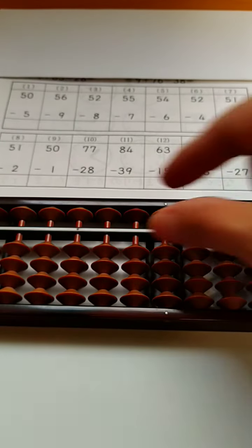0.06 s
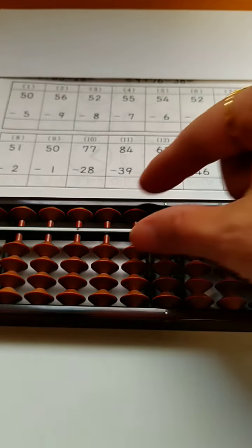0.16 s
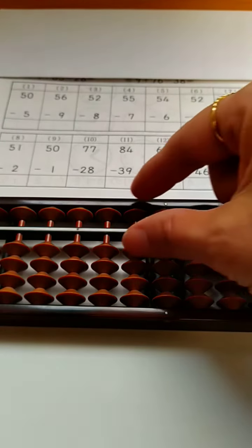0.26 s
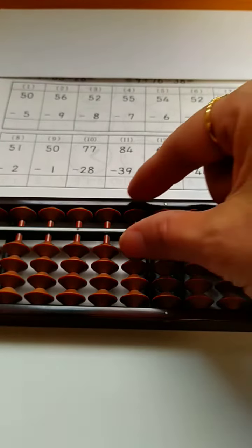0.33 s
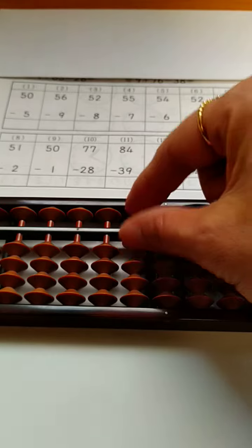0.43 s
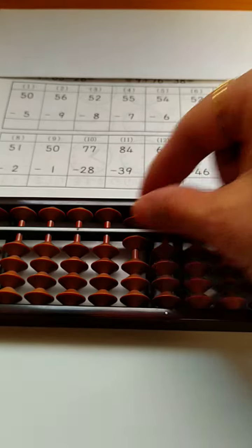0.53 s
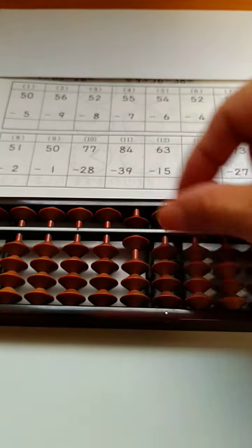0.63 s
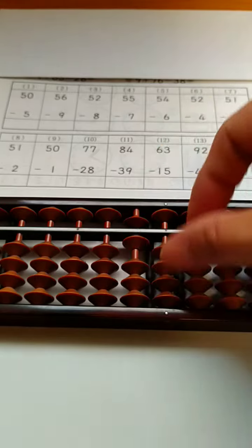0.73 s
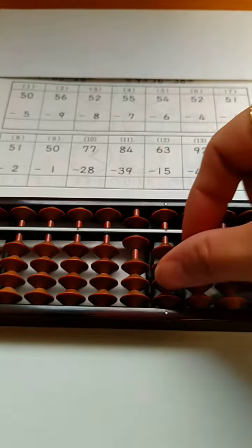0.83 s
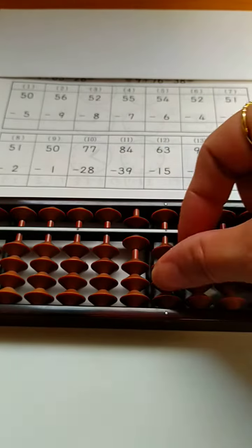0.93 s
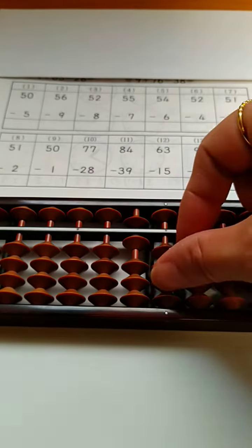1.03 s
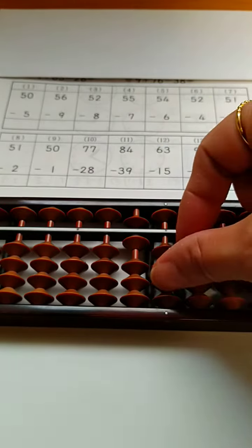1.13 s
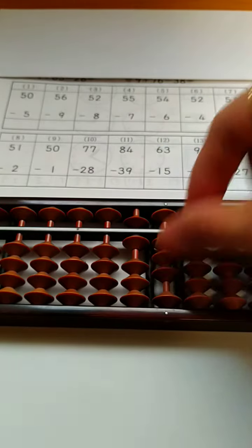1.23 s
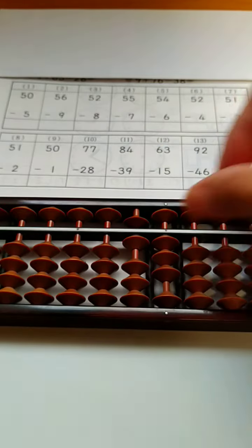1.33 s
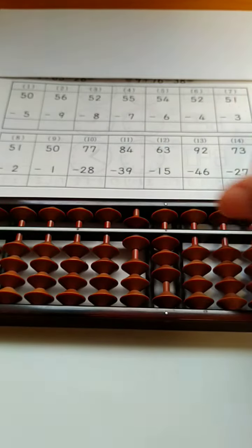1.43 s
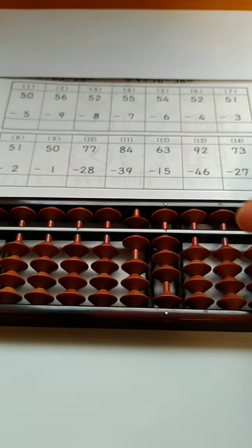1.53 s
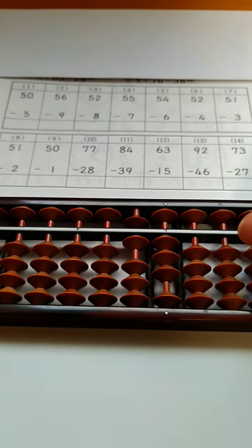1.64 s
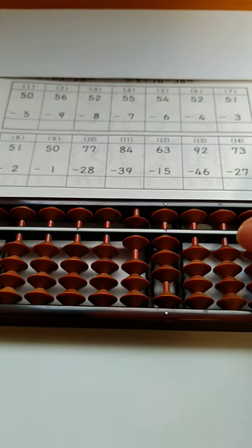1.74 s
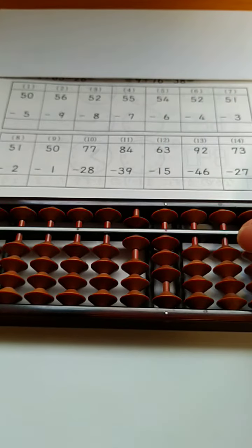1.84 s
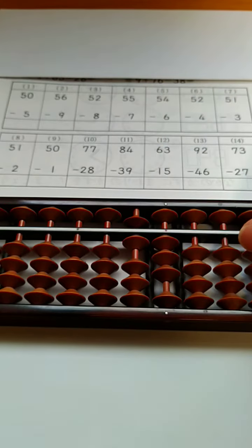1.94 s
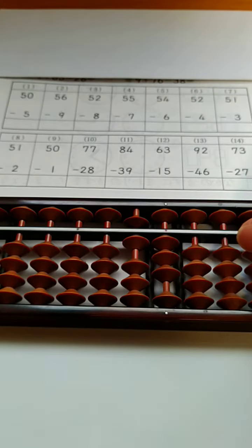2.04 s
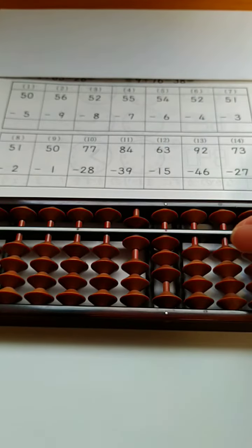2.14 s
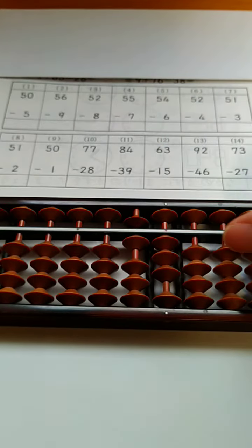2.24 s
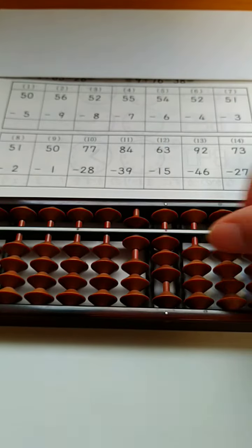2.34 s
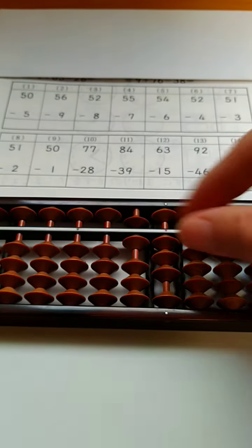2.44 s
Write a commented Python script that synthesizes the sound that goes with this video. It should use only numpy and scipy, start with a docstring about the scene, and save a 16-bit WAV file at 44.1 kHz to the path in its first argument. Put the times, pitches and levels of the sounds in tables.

```python
"""A low, wavering hum and a thin hiss open the scene and run under it, shaped from filtered noise.
Close by, a fingertip pushes abacus beads along their rods: a double click, then a single one.
Each click is three contacts within milliseconds, every one a burst of noise with a high, short ring.
Loose beads rattle as grainy noise, the wooden frame knocks as dying sines, and a small room answers.
A few faint dull taps follow, each a puff of noise with one brief resonance."""
import sys
import numpy as np
from scipy import signal
from scipy.fft import rfft, irfft
from scipy.io import wavfile
from scipy.ndimage import uniform_filter1d

SR = 44100
rng = np.random.default_rng(int(sys.argv[2]) if len(sys.argv) > 2 else 0)


def output_pcm(signal):
    """Save a mono or channel-first signal as 16-bit PCM at the path in sys.argv[1].

    Samples are clipped to [-1, 1] before scaling.
    """
    pcm = np.clip(np.atleast_2d(signal).T, -1, 1) * 32767
    wavfile.write(sys.argv[1], SR, np.round(pcm).astype(np.int16))


N = 110250  # samples, 2.5 s


def amp(db):
    """Decibels to gain."""
    return 10 ** (np.asarray(db) / 20)


def unit(x):
    """Scales to an rms of one."""
    return x / np.sqrt(np.mean(x ** 2) + 1e-20)


def unit_energy(x):
    """Scales each channel to an energy of one."""
    return x / np.linalg.norm(x, axis=1, keepdims=True)


def read(points, hz):
    """Reads a table on a log-frequency axis."""
    f, value = np.transpose(points)
    return np.interp(np.log(hz + 1), np.log(f + 1), value)


def pan(db):
    """Left and right gains for a left-right level difference."""
    return unit(amp(np.array([[db / 2], [-db / 2]])))


def add(mix, s, sound):
    """Mixes a sound in at a time in seconds."""
    part = mix[:, max(round(s * SR), 0):][:, :sound.shape[1]]
    part += sound[:, :part.shape[1]]


def bins(x):
    """Frequencies of a signal's spectrum."""
    return np.fft.rfftfreq(x.shape[-1], 1 / SR)


def colour(x, points):
    """Minimum-phase filter that follows a table of (frequency [Hz], gain [dB])."""
    size = x.shape[-1]
    hz = abs(np.fft.fftfreq(size, 1 / SR))
    log_gain = np.log(amp(read(points, hz)))
    response = np.exp(np.conj(signal.hilbert(log_gain)))[:size // 2 + 1]
    return irfft(rfft(x) * response, size)


def alike(x, points):
    """Makes two unrelated channels partly alike, by a table of (frequency [Hz], likeness [0-1])."""
    left, right = rfft(x)
    likeness = np.clip(read(points, bins(x)), 0, 1)
    blend = likeness * left + np.sqrt(1 - likeness ** 2) * right
    return irfft(np.array([left, blend]), x.shape[-1])


# likeness of the two channels in a burst and in the room tail: (frequency [Hz], likeness [0-1])
CLICK_LIKENESS = [(300, 0.92), (1200, .7), (3000, .1), (15000, 0.022)]


def burst(t, decay_s):
    """A dense, dying scatter of pulses with a nearly even spectrum and an energy of one per channel."""
    fade = np.exp(-t / decay_s)
    x = alike(rng.standard_normal((2, len(t))) * fade, CLICK_LIKENESS)
    # alternately flatten the spectrum and restore the dying envelope
    for _ in range(3):
        flat = irfft(np.exp(1j * np.angle(rfft(x))), len(t))
        x = flat * np.minimum(10 * fade, 1)
    return unit_energy(x)


HUM_WAVER = 0.99  # share of the level swings, in dB, that is heard


def hum(hz, width, swings):
    """A low tone, a narrow band of noise with its level evened out, that drifts in pitch and follows a curve."""
    f = np.fft.fftfreq(N, 1 / SR)
    resonance = 1 + (2 * (f - hz) / width) ** 2
    z = np.fft.ifft(np.exp(2j * np.pi * rng.random(N)) / resonance)
    power = abs(z) ** 2
    steady = z.real / np.sqrt(power + 0.31 * np.mean(power))
    swing_db = np.interp(np.arange(N) / SR, *np.transpose(swings))
    return unit(steady * amp(HUM_WAVER * swing_db))


# hum tones: (frequency [Hz], level [dB], width [Hz])
HUM_TONES = [(57.9, -65, 7), (123.9, -71, 3.6), (217.3, -64, 16)]
# wavering of the deep hum tone: (time [s], relative level [dB])
DEEP_HUM_SWINGS = [(0.0, -66.5), (0.24, -69.5), (0.28, -58), (0.47, -79.5), (0.69, -63.5), (0.8, -78.5),
                   (1.2, -59.5), (1.36, -69.5), (1.73, -58.5), (1.91, -81.5), (1.98, -61.5), (2.33, -74.5),
                   (2.46, -57), (2.5, -67)]
# wavering of the upper hum tone: (time [s], relative level [dB])
UPPER_HUM_SWINGS = [(0.0, -69), (0.05, -75), (0.31, -67), (0.4, -72.5), (0.89, -58), (0.93, -71),
                    (1.45, -61.5), (1.61, -78.5), (1.71, -61.5), (1.76, -72), (1.79, -58), (1.89, -73.5),
                    (1.92, -58.5), (1.95, -68), (2.23, -70.5), (2.26, -61), (2.47, -73), (2.5, -58.5)]
# colour of the low rumble: (frequency [Hz], relative density [dB per Hz])
RUMBLE_COLOUR = [(20, -67), (35, -51), (50, -5), (75, -4.5), (100, -0.5), (135, -6), (160, -10.5),
                 (190, -1.5), (240, -11), (290, -16.5), (400, -19), (520, -24.5), (1000, -29.5),
                 (2000, -35), (8000, -62)]
# colour of the hiss: (frequency [Hz], relative density [dB per Hz])
HISS_COLOUR = [(100, 4), (1000, 0.5), (3000, 0.5), (6000, 0), (9000, 0), (10500, 5.5), (11700, 5.5),
               (12600, 0), (15600, 1.5), (16200, -29.5)]
# likeness of the two background channels: (frequency [Hz], likeness [0-1])
FLOOR_LIKENESS = [(50, 1), (250, 0.83), (500, 0), (1500, 0), (5000, .2), (15000, .1)]
RUMBLE_DB, HISS_DB = -65, -68
LOW_BALANCE_DB = -5  # left against right
LOW_LAG_S = .00038  # the low sound reaches the right channel first


def background():
    """Room rumble and microphone hiss are filtered noise; of three drifting hum tones, two also swing in level."""
    rumble, hiss = (unit(colour(alike(rng.standard_normal((2, N)), FLOOR_LIKENESS), shape))
                    for shape in (RUMBLE_COLOUR, HISS_COLOUR))
    low = amp(RUMBLE_DB) * rumble
    no_swing = [(0, 0)]
    for (hz, db, width), swings in zip(HUM_TONES, (DEEP_HUM_SWINGS, no_swing, UPPER_HUM_SWINGS)):
        low = low + amp(db) * hum(hz, width, swings)
    lag = np.array([[LOW_LAG_S], [0]])
    low = irfft(rfft(low) * np.exp(-2j * np.pi * bins(low) * lag), N)
    return low * pan(LOW_BALANCE_DB) + amp(HISS_DB) * hiss * pan(db=-2.5)


# loose beads shifting: (time [s], relative level [dB], decay of the scatter [s])
RATTLES = [(0.163, -48, 0.0025), (0.2023, -47.5, 0.003), (0.213, -38, 0.0036), (0.305, -27.5, 0.0059),
           (0.3132, -28, 0.0046), (0.3185, -34, 0.0066)]
# colour of a rattle: (frequency [Hz], gain [dB])
RATTLE_COLOUR = [(200, -18), (1000, -11), (2200, -4), (4000, 1.5), (6300, 2.5), (8500, -2), (11200, 12.5),
                 (12500, 0), (14000, -12), (16500, -25)]
RATTLE_GRAIN_DB = 3  # rms unevenness


def rattles():
    """Loose beads settle against the rod: soft ticks made of many uneven tiny contacts."""
    out, t = np.zeros((2, N)), np.arange(2048) / SR
    for s, db, decay_s in RATTLES:
        unevenness = unit(uniform_filter1d(rng.standard_normal(len(t)), size=24))
        tick = burst(t, decay_s) * amp(RATTLE_GRAIN_DB * unevenness)
        add(out, s, 2 * amp(db) * colour(tick / np.linalg.norm(tick[0]), RATTLE_COLOUR))
    return out


# colour of the room tail: (frequency [Hz], gain [dB])
ROOM_COLOUR = [(200, 4), (700, 12), (1200, 3.5), (2500, 6), (4500, 7.5), (7000, 3.5), (9000, 0.5),
               (10500, 3.5), (12000, 1), (13200, -3), (16000, -11)]
# decay of the room tail: (frequency [Hz], time to fall 60 dB [s])
ROOM_T60 = [(200, 0.38), (1000, .21), (4000, 0.18), (10000, 0.33), (16000, 0.22)]
ROOM_DB, ROOM_RISE_S = -15, .004  # level before the colour, time constant of the onset
ROOM_PATCHY_DB = 1.5  # rms unevenness over time and frequency


def room(x):
    """A short diffuse tail: patchy noise that dies at its own rate in each band, convolved with the sound."""
    t = np.arange(16384) / SR
    noise = alike(rng.standard_normal((2, len(t))), CLICK_LIKENESS)
    hz, when, z = signal.stft(noise, SR, nperseg=128)
    fade = amp(-60 * when / read(ROOM_T60, hz)[:, None])
    patches = uniform_filter1d(rng.standard_normal(fade.shape), size=3, axis=0)
    patches = uniform_filter1d(patches, size=2, axis=1)
    z = z * fade * amp(ROOM_PATCHY_DB * unit(patches))
    tail = signal.istft(z, SR, nperseg=128)[1][:, :len(t)]
    tail = tail * (1 - np.exp(-t / ROOM_RISE_S))
    tail = amp(ROOM_DB) * unit_energy(tail)
    return signal.fftconvolve(x, colour(tail, ROOM_COLOUR), axes=1)[:, :N]


# early reflections: (delay [s], level before the colour [dB])
ECHOES = [(.0105, -30.5), (0.016, -32.5), (0.0215, -22)]
# colour of the reflections: (frequency [Hz], gain [dB])
ECHO_COLOUR = [(200, 19), (6000, -3), (11000, 5.5), (13000, -19), (16000, -6.5)]
ECHO_SMEAR_S = .0016


def echoes(x):
    """Early reflections from the nearest walls, each slightly smeared."""
    paths, t = np.zeros((2, 2048)), np.arange(512) / SR
    for delay, db in ECHOES:
        add(paths, delay, amp(db) * burst(t, ECHO_SMEAR_S))
    return signal.fftconvolve(x, colour(paths, ECHO_COLOUR), axes=1)[:, :N]


def ring(t, modes):
    """Dying sines from rows of (frequency [Hz], level [dB], time to fall 60 dB [s])."""
    return sum(amp(db - 60 * t / t60) * np.sin(2 * np.pi * hz * t) for hz, db, t60 in modes)


# pushes that reach the frame: (time [s], relative level [dB], high modes against the low ones [dB])
KNOCKS = [(.201, -41.5, -28), (0.24, -58.5, 7), (.262, -53, 1.5), (0.31, -46, -23), (1.0175, -37, -0.5)]
# low modes of the frame: (frequency [Hz], relative level [dB], time to fall 60 dB [s])
FRAME_LOW = [(340.6, -6.5, 0.082), (370.5, 5, 0.065), (391.8, -3, 0.073)]
# high modes of the frame: (frequency [Hz], relative level [dB], time to fall 60 dB [s])
FRAME_HIGH = [(607, -20.5, .05), (1065, -6.5, 0.01824), (1140, -1, .028), (1370, -7.5, 0.027),
              (2150, -5.5, 0.034), (2630, 4, 0.02125), (2800, -3.5, .018), (3890, 5.5, 0.018),
              (4400, 6, 0.021), (6040, 0.5, .01)]
FRAME_RISE_S, FRAME_HIGH_RISE_S = 0.0061, 0.0018  # swell of the low and of the high modes
FRAME_LAG_S = 0.00021  # lag of the high modes in the left channel


def frame():
    """The wooden frame swells into a low knock; shorter modes above it reach the left channel a little later."""
    out, t = np.zeros((2, N)), np.arange(8192) / SR
    late = np.maximum(t - np.array([[FRAME_LAG_S], [0]]), 0)
    low = ring(t, FRAME_LOW) * (1 - np.exp(-t / FRAME_RISE_S)) ** 2
    high = ring(late, FRAME_HIGH) * (1 - np.exp(-late / FRAME_HIGH_RISE_S))
    for s, db, high_db in KNOCKS:
        add(out, s, amp(db) * (pan(db=-3.5) * low + amp(high_db) * pan(db=-0.5) * high))
    return out


BOUNCE_S, BOUNCE_DB = .00125, -1.5  # gap between contacts; second contact against the first


def contact_train(last_db):
    """A bead meets its neighbour three times in quick succession: (delay [s], level [dB])."""
    return [(k * BOUNCE_S, db) for k, db in enumerate((0, BOUNCE_DB, last_db))]


# modes of a bead: (pitch ratio, relative level [dB])
BEAD_MODES = [(0.77, -6), (0.952, 4.5), (1, 2.5), (1.069, -7.5), (1.15, -29)]
RING_S, RING_RISE_S = .0009, .00015  # time constants of decay and onset


def bead_ring(t, hz):
    """A struck bead sounds a cluster of high modes that start in random phase and die together."""
    phases = rng.uniform(0, 2 * np.pi, (len(BEAD_MODES), 2, 1))
    modes = sum(amp(db) * np.sin(2 * np.pi * hz * ratio * t + phase)
                for (ratio, db), phase in zip(BEAD_MODES, phases))
    return modes * np.exp(-t / RING_S) * (1 - np.exp(-t / RING_RISE_S))


# beads driven home: (time [s], relative level [dB], ring pitch [Hz], ring against the crack [dB],
# ring left against right [dB], last contact against the first [dB])
STRIKES = [(0.2365, -7, 10980, -13.5, 6.5, 0.5), (0.2615, -5.5, 11380, 2, 3.5, -16),
           (1.019, -5.5, 10510, -1, -2.5, -1)]
# colour of a crack: (frequency [Hz], gain [dB])
CRACK_COLOUR = [(100, -32.5), (750, -25.5), (1100, -29), (1700, -24), (2800, -12), (4100, -11.5),
                (5200, -7.5), (5800, -10.5), (6500, -3.5), (7200, -8.5), (8300, -2.5), (9200, -7),
                (11200, -4.5), (13000, 0), (15300, -6.5), (16500, -17)]
# balance of a crack: (frequency [Hz], left against right [dB])
CRACK_SIDE = [(1000, 1), (2500, 1.5), (5000, -0.5), (10300, -8), (12500, 0.5), (15000, 2.5)]
CRACK_S = .0009  # decay of the scatter


def beads():
    """Each contact is a sharp crack and a very short, high ring of the bead; returns cracks and rings."""
    cracks, rings, t = np.zeros((2, N)), np.zeros((2, N)), np.arange(1024) / SR
    for s, db, hz, ring_db, side_db, last_db in STRIKES:
        crack, tone = np.zeros((2, 2, len(t)))
        for delay, contact_db in contact_train(last_db):
            add(tone, delay, amp(contact_db) * bead_ring(t, hz))
            add(crack, delay, amp(contact_db) * burst(t, CRACK_S))
        side = amp(read(CRACK_SIDE, bins(crack)) * np.array([[.5], [-.5]]))
        panned_crack = irfft(rfft(crack) * side)
        add(cracks, s, 2 * amp(db) * colour(panned_crack, CRACK_COLOUR))
        # the ring is balanced against the uncoloured crack
        matched_ring = unit_energy(tone) * np.linalg.norm(crack[0])
        add(rings, s, 2 * amp(db + ring_db) * pan(side_db) * matched_ring)
    return cracks, rings


# faint dull taps: (time [s], peak level of the puff [dB], main pitch [Hz])
TAPS = [(1.397, -59.5, 1148), (1.409, -57.5, 1056), (1.432, -66, 2150), (1.553, -62.5, 1170),
        (1.579, -61.5, 1140), (1.975, -64.5, 1560), (1.987, -68.5, 1514), (2.079, -67.5, 2200)]
# colour of a puff: (frequency [Hz], gain [dB])
TAP_BODY = [(150, -14), (430, 13), (600, 5.5), (850, -8), (1400, -12.5), (2500, -8.5), (6000, -27),
            (16000, -43)]
TAP_S, TAP_RING_DB = 0.0065, -3.5  # decay; resonance against the puff's peak


def taps():
    """Soft contacts: a dull puff with one brief resonance."""
    out, t = np.zeros((2, N)), np.arange(4096) / SR
    for s, db, hz in TAPS:
        puff = colour(burst(t, TAP_S), TAP_BODY)
        tone = amp(TAP_RING_DB) * np.exp(-t / TAP_S) * np.sin(2 * np.pi * hz * t)
        add(out, s, amp(db) * (puff / abs(puff).max() + tone))
    return out


RING_ROOM_DB = -9.5  # the ring feeds the diffuse tail less than the crack does


def scene():
    """The abacus in its room."""
    cracks, rings = beads()
    body = cracks + rattles() + frame() + taps()
    direct = body + rings
    tail = room(body + amp(RING_ROOM_DB) * rings)
    return direct + echoes(direct) + tail + background()


EDGE_HZ = 16700


def record(dry):
    """The recorder's band limit: a steep low-pass."""
    low_pass = signal.firwin(255, EDGE_HZ, window=("kaiser", 9), fs=SR)
    return signal.oaconvolve(dry, low_pass[None], "same")


dry = scene()
out = record(dry)
output_pcm(out)
```